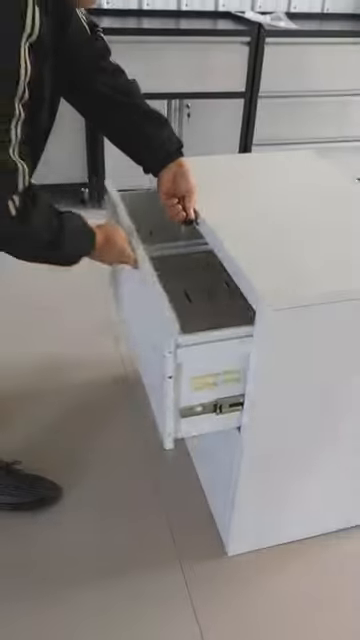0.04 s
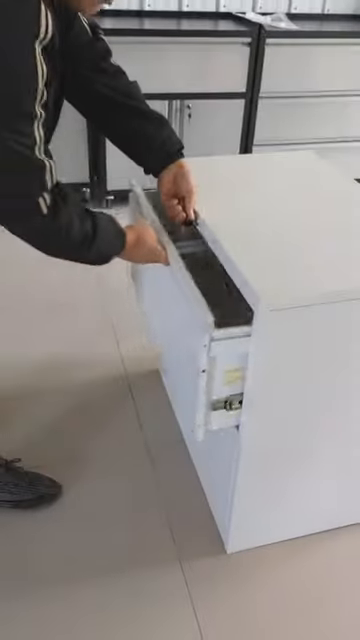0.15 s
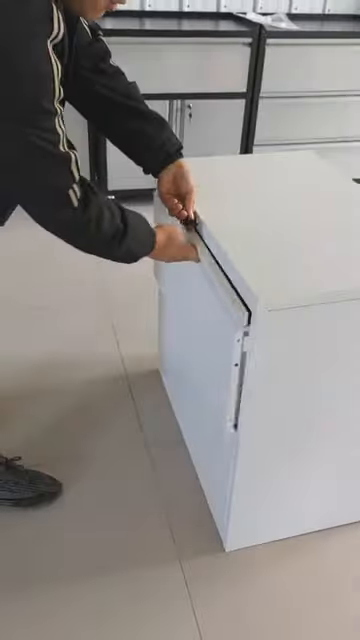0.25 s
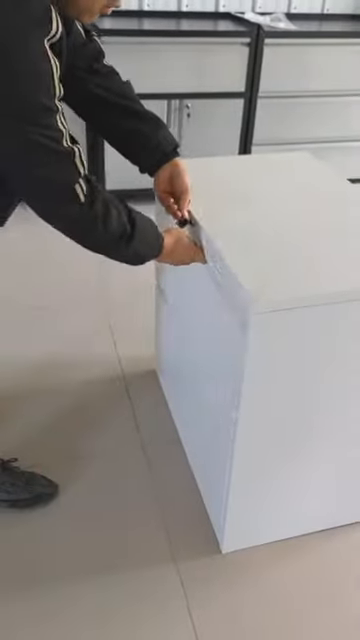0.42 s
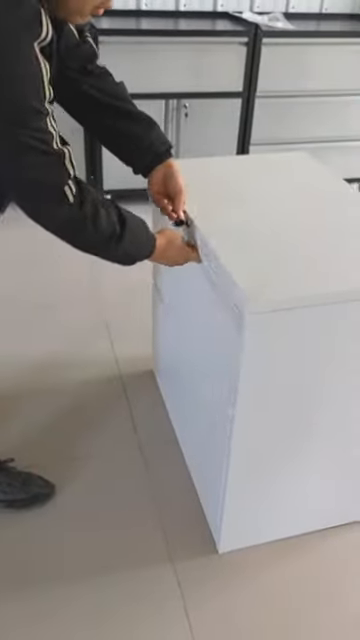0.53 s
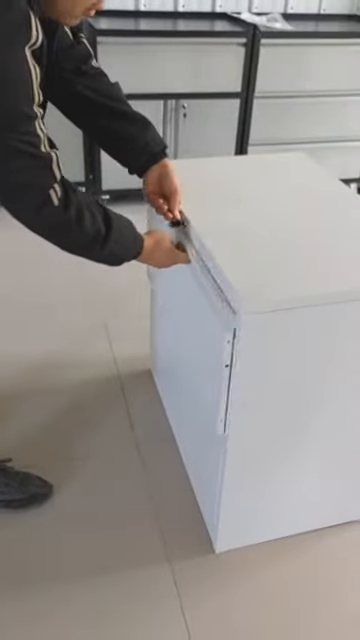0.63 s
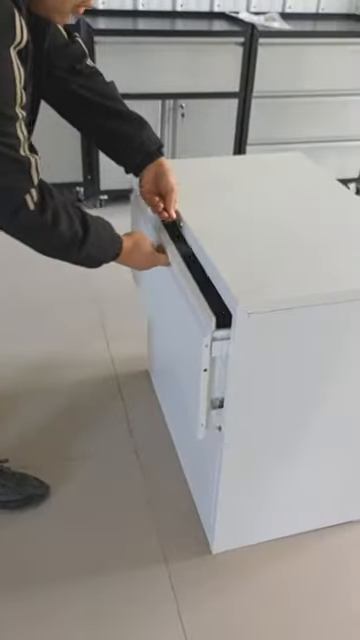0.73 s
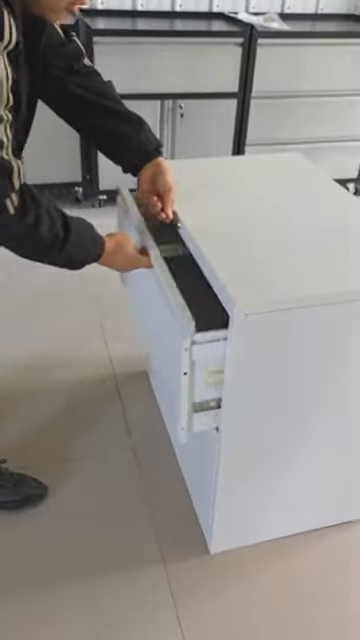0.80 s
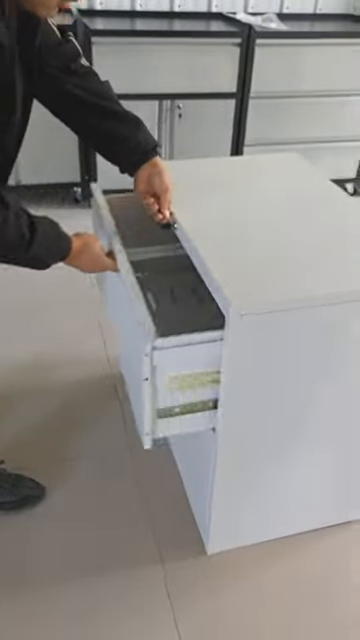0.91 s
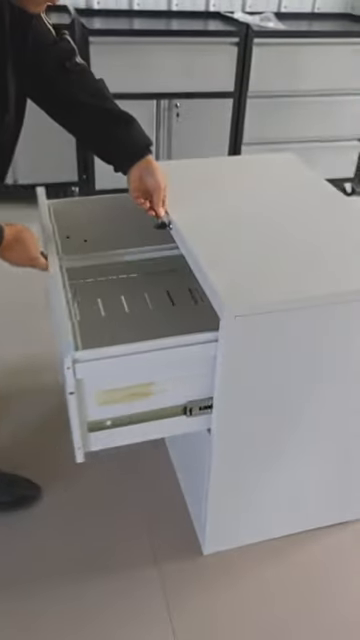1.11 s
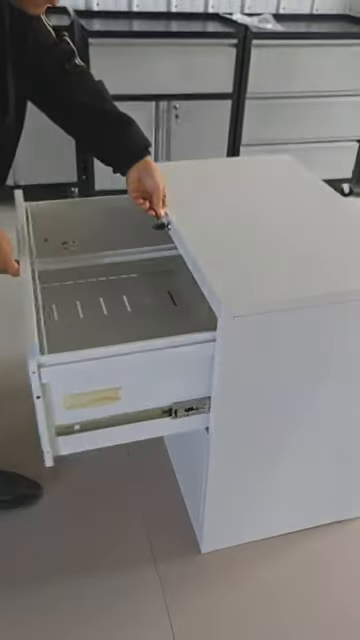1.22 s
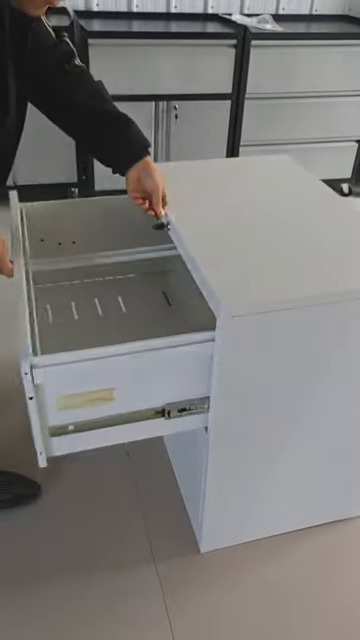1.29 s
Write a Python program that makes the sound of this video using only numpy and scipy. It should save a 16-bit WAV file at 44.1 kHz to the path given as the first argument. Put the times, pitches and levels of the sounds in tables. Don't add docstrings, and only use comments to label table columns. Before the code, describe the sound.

Sharp metallic knocks and a gritty rolling scrape lead into a hollow drawer slam with ringing sheet panels; softer clinks and rolling follow, then near quiet and tiny ticks, in a reverberant room on a phone microphone.

```python
import sys
import numpy as np
from scipy import signal
from scipy.fft import rfft, irfft
from scipy.io import wavfile
from scipy.ndimage import uniform_filter1d

SR = 44100
rng = np.random.default_rng(int(sys.argv[2]) if len(sys.argv) > 2 else 0)


def rack_gain(trim_db):
    fader = np.asarray(trim_db, float)
    return 10 ** (fader / 20)


def bounce(signal):
    frames = np.transpose(np.atleast_2d(signal))
    limited = np.clip(frames, -1, 1)
    pcm = np.round(limited * 32767).astype(np.int16)
    wavfile.write(sys.argv[1], SR, pcm)


N = 59535

# (frequency [Hz], density [dB per Hz])
HUM_SPECTRUM = [(25, 11.5), (45, 6), (71, -2), (290, -7.5), (650, -19), (900, -20.5), (1400, -35.5),
                (3200, -45), (4500, -46.5), (8000, -63), (14000, -66)]
# (frequency [Hz], t60 [s])
HALL_DECAY = [(80, 0.42), (250, 1.58), (1000, 1.3), (3000, 1.08), (6000, 0.87), (8500, 0.56), (13000, 0.69)]
# (time [s], level [dB])
HANDLE_TICKS = [
    (1.255, -70),
    (1.2685, -59),
    (1.2749, -51),
    (1.285, -54),
    (1.308, -77),
]
# (time [s], level [dB])
ROLLING_EFFORT = [(0, -99), (0.153, -86), (0.162, -55.5), (.23, -52), (0.259, -39), (.38, -40.5),
                  (0.472, -43.5), (.56, -54.5), (0.6, -55), (0.65, -56), (0.7, -56), (.712, -52.5),
                  (0.769, -48.5), (0.814, -49.5), (.85, -73.5), (.95, -70), (1.202, -73.5), (1.35, -71)]
# (frequency [Hz], density [dB per Hz])
BALL_SPECTRUM = [(180, -16), (300, -9), (480, -5), (930, -6.5), (1660, -9.5), (2920, -10.5), (5860, -17),
                 (14200, -31.5)]
# (start [s], length [s], level [dB], centre [Hz])
SCRAPES = [
    (0.1553, 0.038, -54, 3020),
    (0.235, 0.015, -33.5, 5550),
    (0.3267, 0.051, -34.5, 6070),
    (0.59, 0.0087, -58, 4500),
    (0.766, 0.062, -66, 3900),
    (0.737, 0.081, -48.5, 5160),
    (.775, 0.042, -54, 4900),
    (.7055, .1, -55, 7600),
    (.704, 0.022, -58, 2240),
    (0.747, 0.076, -56.5, 2600),
]
# (frequency [Hz], level [dB], t60 [s])
STOP_MODES = [(281, -4, 0.13), (623, -5, 0.06), (697, -7.5, 0.076), (937.5, -4, 0.12), (1040, 0, 0.04),
              (1287, 0, 0.068), (1770, -17, 0.057), (2176, -5, 0.1), (3266, -1, 0.017), (4310, -8, 0.048),
              (5305, -9, 0.039), (5910, -6, 0.027), (7350, -10.5, 0.016), (12140, -10, 0.021)]
# (time [s], level [dB])
STOP_KNOCKS = [
    (.2376, -30),
    (.2395, -34.5),
    (.2432, -32.5),
    (.2478, -27),
    (.2525, -35),
    (.2965, -47),
    (.3455, -30.5),
    (.3545, -37),
    (.7075, -39.5),
    (.7272, -49),
]
# (time [s], level [dB], frequency [Hz], t60 [s])
CHINKS = [(0.71, -40, 2620, .04), (.716, -43, 4920, .012), (.727, -41, 5440, 0.022),
          (.745, -47, 2230, 0.025), (0.77, -38, 3014, .05), (0.778, -45, 2880, 0.05),
          (0.784, -47, 3056, 0.099), (.795, -52, 2220, .04), (0.807, -45, 3220, 0.028),
          (.83, -43.5, 3360, 0.017), (0.482, -38, 3060, 0.035), (0.768, -51, 8150, 0.041)]
# (time [s], level [dB],
# frequency [Hz], t60 [s])
PANEL_FLEXES = [(.395, -24, 929, 0.1), (.396, -30, 574, 0.33), (.405, -30.5, 979, 0.22),
                (.43, -31.5, 678, 0.13), (.432, -32, 312, 0.091), (.452, -26, 949, 0.099),
                (.462, -28, 531, 0.13), (.47, -32.5, 604, 0.19), (.495, -28.5, 872, .2),
                (.51, -33, 599, 0.14), (.545, -34.5, 740, 0.11), (.7075, -47.5, 1040, 0.065),
                (.725, -38, 918, .12), (.79, -40, 601, .12), (.79, -36.5, 330.3, .12)]
# (frequency [Hz], density [dB per Hz])
STEEL_SPECTRUM = [(180, -15), (400, -11.5), (760, 2.5), (1150, -5.5), (1600, -6.5), (3000, -12.5),
                  (6000, -20.5), (14200, -33)]
# (frequency [Hz], level [dB], t60 [s])
RUNNER_MODES = [(996, -6.5, 0.16), (1110, -34, 0.042), (1210, -11, 0.13), (2330, -7.5, 0.54),
                (2200, -3, 0.14), (2887, 5.5, 0.031), (4330, -25, 0.054), (5200, -23.5, 0.0093),
                (5640, -32, 0.0091), (12700, -36, .015)]
# (frequency [Hz], density [dB per Hz])
SHEET_SPECTRUM = [(140, -35), (230, -5.5), (329, -2), (408, -17), (584, -1.5), (707, -8.5), (965, -8.5),
                  (1430, -17), (4000, -32), (5200, -64), (8800, -120)]
# (frequency [Hz], level [dB], t60 [s])
PANEL_MODES = [(242.8, -0.5, 0.34), (279, -0.5, 0.43), (327, 2.5, 0.091), (485, -2, 0.2), (534, -2, 0.25),
               (567.4, -0.5, 0.15), (584.7, 2, 0.11), (670, -20, 0.1), (747, -8, 0.44), (891, 0, 0.47),
               (945.5, 0.5, 0.16), (1003, -9.5, 0.26), (1258, -12, 0.46)]
# (frequency [Hz], level [dB], t60 [s])
BOX_MODES = [(87.6, 2, 0.19), (98.5, -4, 0.19), (125, 0, 0.25), (150.8, 4, 0.11), (176.8, -3, 0.24),
             (205.9, 1, 0.33), (227.9, -2, 0.56)]
# (time [s], runner clank [dB], panel thump [dB], cabinet boom [dB], boom centre [Hz])
IMPACTS = [(0.158, -66, -54, -79, 202), (0.199, -82, -45.5, -64, 230), (0.224, -76, -75, -39, 237),
           (.237, -29.5, -35, -43.5, 130), (0.263, -67, -44.5, -33.5, 125),
           (.296, -30.5, -33, -30.5, 133.3), (.345, -28.5, -29, -36.5, 148), (.393, -71, -25, -22, 141),
           (.405, -58, -30.5, -23.5, 90), (.42, -64, -25, -22, 142.5), (.438, -36.5, -27, -25, 187.6),
           (.458, -59, -25, -24, 197), (.485, -48, -36, -31, 174.3), (.508, -61, -27, -26.5, 113),
           (0.551, -48, -37.5, -36, 208.6), (0.584, -57, -36, -38.5, 125), (.635, -57, -37, -29.5, 85.6),
           (.707, -39, -36, -48, 210), (.725, -38, -44.5, -39, 201), (.768, -45.5, -34.5, -34.5, 120.3),
           (0.793, -62, -42, -37.5, 120.8), (.815, -58, -44, -39, 225.3), (0.938, -92, -62, -62, 125),
           (1.001, -68, -85, -49, 125), (1.088, -86, -51, -44, 132.5), (1.23, -91, -54.5, -51, 232),
           (1.261, -64, -53.5, -48.5, 130.4)]
# (frequency [Hz], gain [dB])
MIC_TREBLE = [(8700, -7.5), (10000, -5), (12200, -5), (14200, -7)]

BALL_TICKS_PER_S = 3000


def evened(x):
    return x / np.sqrt(np.mean(x ** 2) + 1e-20)


def unit(x):
    return x / np.linalg.norm(x)


def read(points, hz):
    f, value = np.transpose(points)
    return np.interp(np.log(hz + 1), np.log(f + 1), value)


def coloured(spectrum, size):
    white = rfft(rng.standard_normal(size))
    gain = rack_gain(read(spectrum, np.fft.rfftfreq(size, 1 / SR)))
    return evened(irfft(white * gain, size))


def ticks(size, per_s):
    struck = rng.random(size) < per_s / SR
    excess = np.minimum(rng.exponential(1, size), 4)
    sign = rng.choice([-1, 1], size)
    return struck * sign * rack_gain(3.5 * excess)


def ring(hz, db, t60, t):
    return rack_gain(db - 60 * t / t60) * np.sin(2 * np.pi * hz * t)


def rings(modes, t):
    detune = 0.02396
    spot = rng.uniform(0.44, 1, len(modes)) * rng.choice([-1, 1], len(modes))
    tune = 1 + detune * rng.uniform(-1.019, 1, len(modes))
    return unit(sum(share * ring(hz * shift, db, t60, t)
                    for share, shift, (hz, db, t60) in zip(spot, tune, modes)))


def body(spectrum, t60, modes, modes_db):
    t = np.arange(SR // 2) / SR
    wash = unit(coloured(spectrum, len(t)) * rack_gain(-60 * t / t60))
    return unit(wash + rack_gain(modes_db) * rings(modes, t))


def steel():
    return body(STEEL_SPECTRUM, 0.088, RUNNER_MODES, -6.5)


def sheet():
    return body(SHEET_SPECTRUM, 0.18, PANEL_MODES, -4)


def room_hum():
    level_db, fade_s = -44.5, 0.02
    fade = np.minimum(np.arange(N) / SR / fade_s, 1)
    return rack_gain(level_db) * coloured(HUM_SPECTRUM, N) * fade


def tail():
    gap_s = 0.0059
    hz, t, z = signal.stft(rng.standard_normal(N), SR, nperseg=256)
    decay = rack_gain(-60 * t / read(HALL_DECAY, hz)[:, None])
    wash = signal.istft(z * decay, SR, nperseg=256)[1][:N]
    onset = np.clip(np.arange(N) / SR / gap_s - 1, 0, 1)
    return unit(wash * onset)


def hall(x):
    turn_s = 0.202
    turn = np.pi / 2 * np.arange(N) / SR / turn_s
    return sum(signal.fftconvolve(x * share, tail())[:N] for share in (np.sin(turn), np.cos(turn)))


def handle():
    low_hz, top_hz, t60 = 4650, 13100, 0.048
    out, t = np.zeros(N + SR), np.arange(SR // 10) / SR
    thin = signal.butter(N=2, Wn=[low_hz, top_hz], btype="band", fs=SR, output="sos")
    for s, db in HANDLE_TICKS:
        tick = signal.sosfilt(thin, rng.standard_normal(len(t)))
        out[round(s * SR):][:len(t)] += tick * rack_gain(db - 60 * t / t60)
    return out[:N]


def catch():
    air_db, span = -1, 1.18
    out = np.zeros(N)
    for s, length, db, hz in SCRAPES:
        progress = np.clip((np.arange(N) / SR - s) / length, 0, 1)
        swell = np.sin(np.pi * np.sqrt(progress))
        grit = evened(ticks(N, 2 * BALL_TICKS_PER_S))
        band = signal.butter(N=2, Wn=[hz / span, hz * span], btype="band", fs=SR, output="sos")
        scrape = evened(signal.sosfilt(band, grit)) + rack_gain(air_db) * np.gradient(grit)
        out += rack_gain(db) * scrape * swell
    return out


def rolling():
    hiss_t60, rumble_db = 0.009, -4.5
    s, db = np.transpose(ROLLING_EFFORT)
    t = np.arange(SR // 2) / SR
    effort = rack_gain(np.interp(np.arange(N) / SR, s, db))
    out = np.zeros(N)
    for side in "LR":
        hiss = unit(coloured(BALL_SPECTRUM, len(t)) * rack_gain(-60 * t / hiss_t60))
        track = hiss + rack_gain(rumble_db) * sheet()
        force = evened(ticks(N, BALL_TICKS_PER_S)) * effort
        out += signal.fftconvolve(force, track)[:N]
    return out


def latch():
    out, t = np.zeros(N + SR), np.arange(SR // 4) / SR
    for k, (s, db) in enumerate(STOP_KNOCKS):
        for m, (hz, mode_db, t60) in enumerate(STOP_MODES):
            sign = (-1) ** (k * m // 2 + m)
            out[round(s * SR):][:len(t)] += sign * ring(hz, db + mode_db, t60, t)
    for s, db, hz, t60 in CHINKS + PANEL_FLEXES:
        out[round(s * SR):][:len(t)] += ring(hz, db, t60, t)
    return out[:N]


def boom(focus_hz, t):
    focus_db_per_octave, wall_t60 = 14, 0.19
    near = [(hz, db - focus_db_per_octave * abs(np.log2(hz / focus_hz)), t60) for hz, db, t60 in BOX_MODES]
    wall = unit(ring(focus_hz, 0, wall_t60, t))
    return unit(rings(near, t) + wall)


def impacts():
    chatter_per_s, chatter_s = 1200, 0.011
    out, t = np.zeros(N + SR), np.arange(SR // 2) / SR
    for s, clank_db, thump_db, boom_db, focus_hz in IMPACTS:
        chatter = ticks(len(t), chatter_per_s) * np.exp(-(t / chatter_s) ** 2)
        force = unit(chatter + 3 * (t == 0))
        solid = rack_gain(clank_db) * steel() + rack_gain(thump_db) * sheet()
        sound = signal.fftconvolve(force, solid)[:len(t)]
        out[round(s * SR):][:len(t)] += 30 * (sound + rack_gain(boom_db) * boom(focus_hz, t))
    return out[:N]


def scene():
    hall_db = -7
    drawer = impacts() + rolling() + catch() + handle() + latch()
    return (drawer + rack_gain(hall_db) * hall(drawer) + room_hum())[None]


def treble_gate(x):
    frame, bins = 1024, 16
    shelf_hz, from_hz = 8700, 6400
    seam_hz, seam_width_hz, seam_db = 8850, 110, -12
    gate_db, rise_db_per_khz, slope, spread_db = -79.5, 1.2, 0.25, 5
    hole_rarity, hole_db = 1.35, -16
    hz, t, z = signal.stft(x, SR, nperseg=frame)
    bands = (len(hz) - 1) // bins
    z = z * np.where((hz > shelf_hz)[:, None], rack_gain(read(MIC_TREBLE, hz))[:, None], 1)
    seam = np.exp(-((hz - seam_hz) / seam_width_hz) ** 2)
    z = z * rack_gain(seam_db * seam)[:, None]
    power = (abs(z[1:]) ** 2).reshape(bands, bins, -1).sum(1)
    sill_db = gate_db + rise_db_per_khz * (hz[bins::bins, None] - shelf_hz) / 1000
    waver = evened(uniform_filter1d(rng.standard_normal(power.shape), size=4))
    over_db = 10 * np.log10(power + 1e-20) - sill_db + spread_db * waver
    keep = np.repeat(1 / (1 + np.exp(-np.clip(slope * over_db, -20, 20))), bins, 0)
    chance = evened(uniform_filter1d(rng.standard_normal((2 * bands, len(t))), size=3))
    strips = chance > hole_rarity
    keep = keep * np.repeat(rack_gain(hole_db * strips), bins // 2, 0)
    keep = np.vstack([keep[:1], keep])
    gated = z * np.where((hz > from_hz)[:, None], keep, 1)
    return signal.istft(gated, SR, nperseg=frame)[1][:N]


def band_limit(x):
    return signal.sosfilt(signal.butter(12, 14390, fs=SR, output="sos"), x)


def record(dry):
    low_hz, edge_hz = 64.4, 14150
    low = signal.butter(N=3, Wn=low_hz, btype="high", fs=SR, output="sos")
    edge = signal.firwin(511, edge_hz, window=("kaiser", 9), fs=SR)[None]
    gated = treble_gate(signal.sosfilt(low, dry[0]))[None]
    mix = signal.oaconvolve(gated, edge, "same")
    return band_limit(mix)


dry = scene()
out = record(dry)
bounce(out)
```